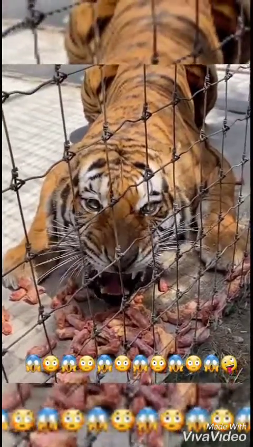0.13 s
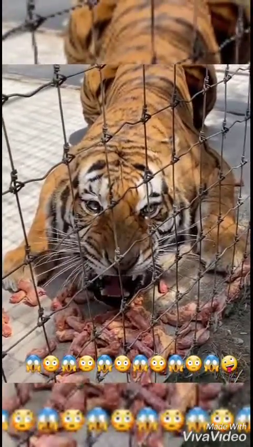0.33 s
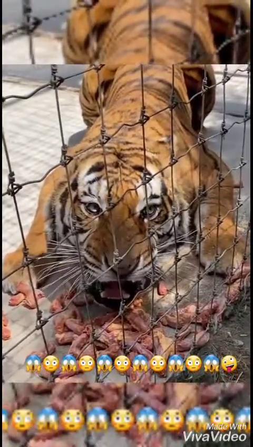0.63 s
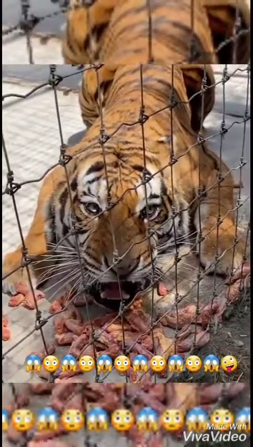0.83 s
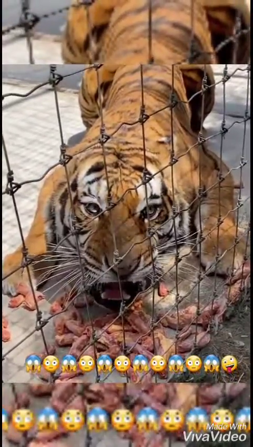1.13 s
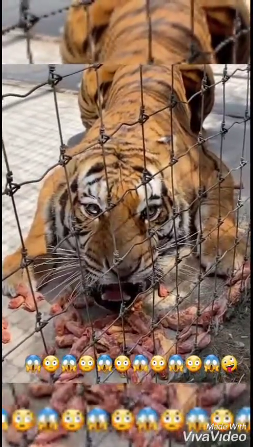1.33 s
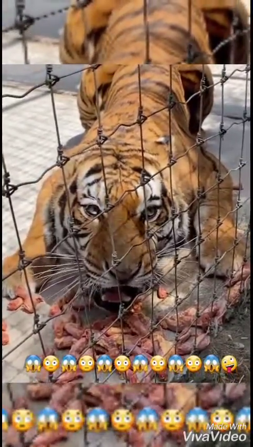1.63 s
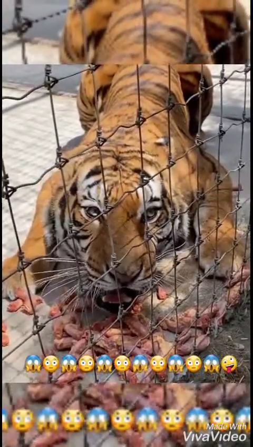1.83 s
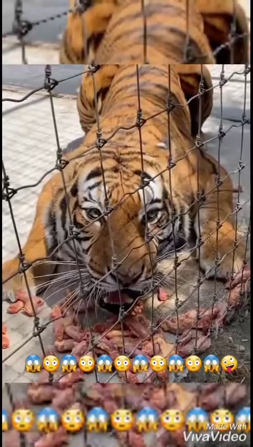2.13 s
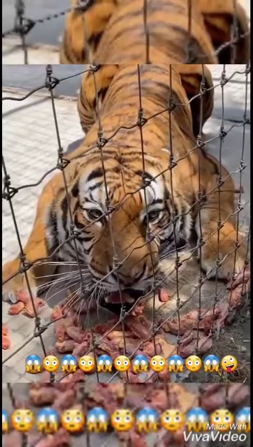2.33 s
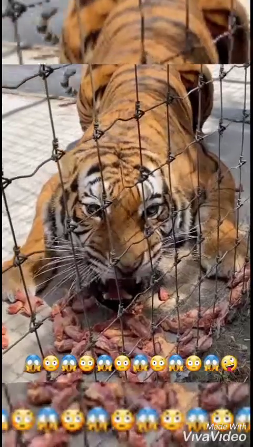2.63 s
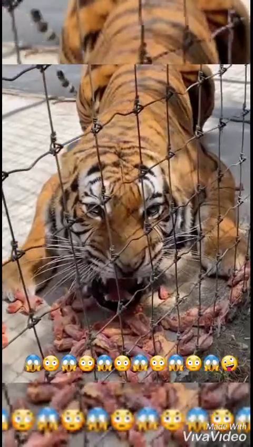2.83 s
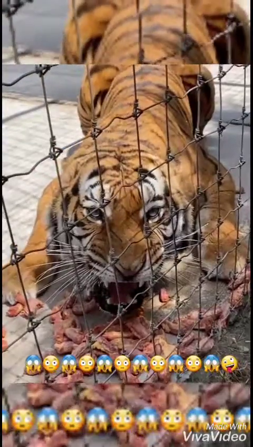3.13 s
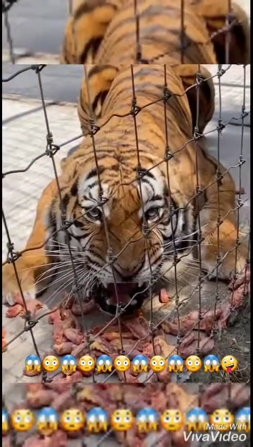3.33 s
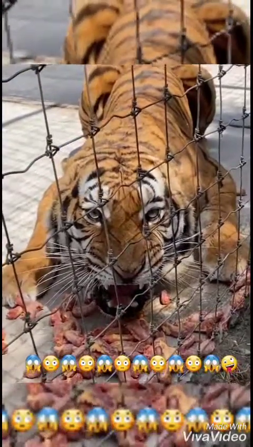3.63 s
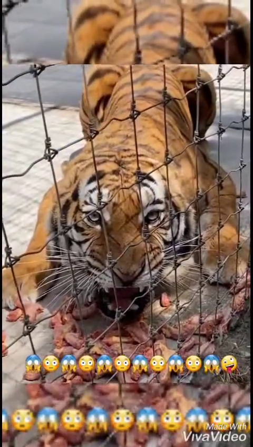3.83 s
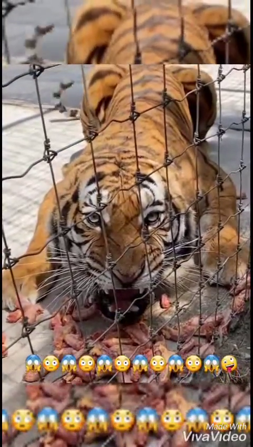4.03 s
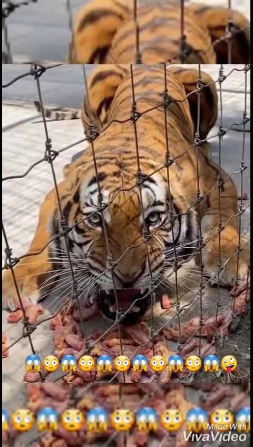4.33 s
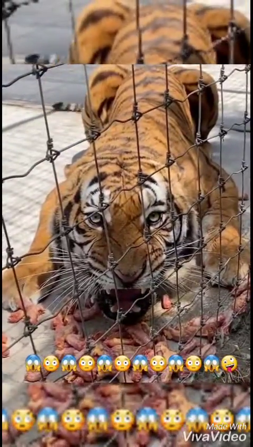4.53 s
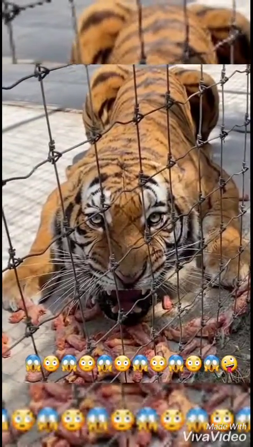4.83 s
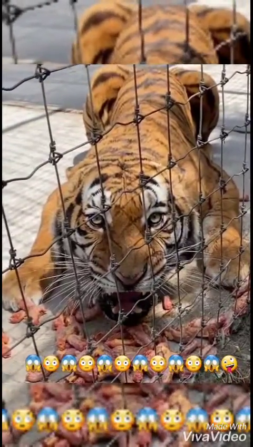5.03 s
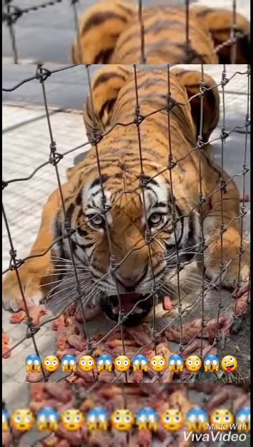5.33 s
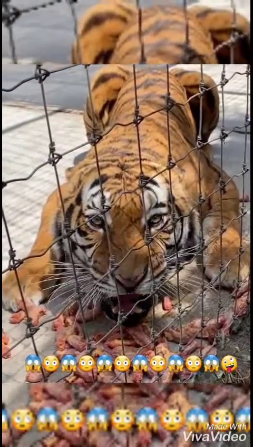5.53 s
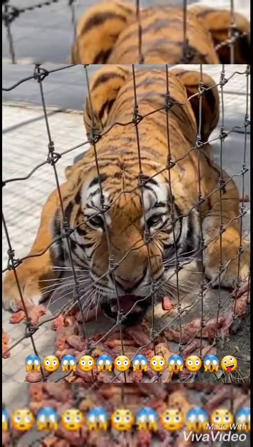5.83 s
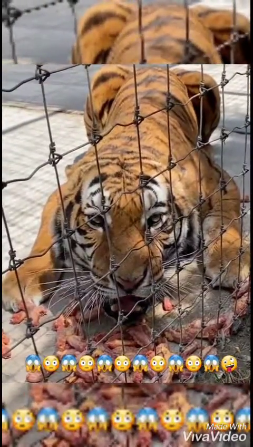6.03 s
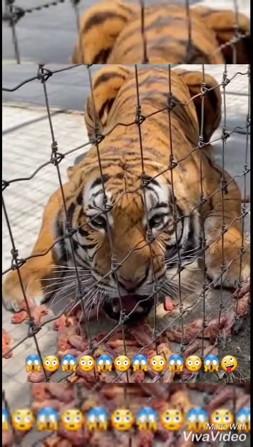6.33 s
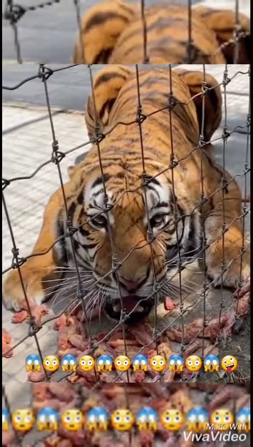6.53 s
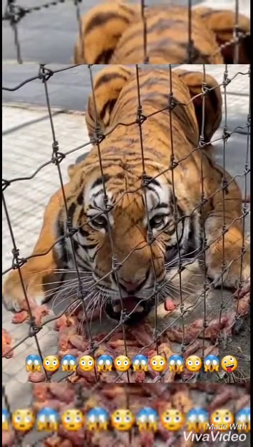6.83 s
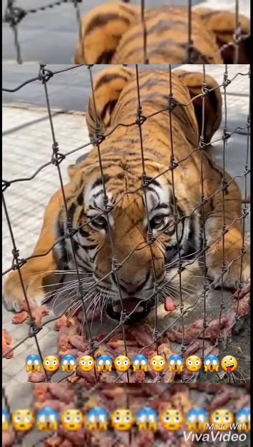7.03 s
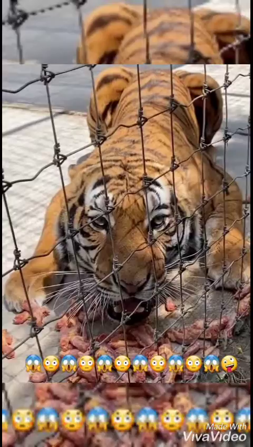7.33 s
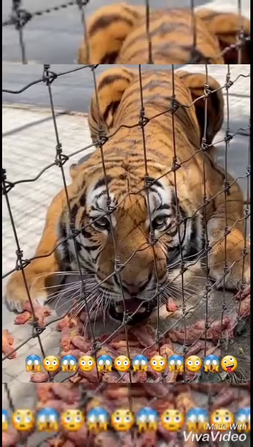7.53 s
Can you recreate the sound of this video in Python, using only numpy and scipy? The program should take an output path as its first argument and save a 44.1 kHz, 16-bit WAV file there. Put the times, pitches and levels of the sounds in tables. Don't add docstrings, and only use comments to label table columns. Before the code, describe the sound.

Outdoors in a paved yard, a tiger is very close to a phone microphone, with slight scatter from hard surfaces and faint distant rumble. From 0 to 1.7 s a pulsing growl, about 40 flaps a second, weakens and slows, with a brief rasp near 0.9. Tiny distant falling bird chirps come at 1.4, 1.6 and 2.1. At 1.8 a small hollow gasp starts an inward snore, quick then slow and popping, until 2.6. A long growl swells strongly around 2.8-3.1, then rattles lower, faintly raspy, thinning to isolated flaps by 5.3. A louder gasp at 5.4 leads a fast, ringing snore that slows into pops by 6.2. The last growl bursts into the loudest, hard raspy snarl at 6.4-6.8, then drops to a softer steady rattle until 7.7. Breath hisses through mouth and teeth; the treble is slightly patchy.

```python
import sys
import numpy as np
from scipy import signal
from scipy.fft import rfft, irfft, next_fast_len
from scipy.io import wavfile
from scipy.ndimage import uniform_filter1d, map_coordinates

SR = 44100
rng = np.random.default_rng(int(sys.argv[2]) if len(sys.argv) > 2 else 0)


def gain_from_decibels(decibels):
    exponent = np.asarray(decibels, float) / 20
    return 10 ** exponent


def pcm_store(signal):
    levels = np.round(np.clip(np.atleast_2d(signal), -1, 1) * 32767)
    wavfile.write(sys.argv[1], SR, levels.astype(np.int16).T)


N = 339112

# (start [s], end [s])
INWARD = [
    (1.8, 2.59),
    (5.41, 6.21),
]
MEAN_EFFORT_DB = -32
SLOW_HZ = 31


def unit(x):
    return x / np.sqrt(np.mean(x ** 2) + 1e-20)


def look_up(table, x):
    return np.interp(x, *np.transpose(table))


def curves(tables):
    s, *cols = np.transpose(np.concatenate(tables))
    return [np.interp(np.arange(N) / SR, s, c) for c in cols]


def wobble(rate):
    knots = rng.standard_normal(int(N * rate / SR) + 4)
    return map_coordinates(knots, [np.arange(N) * rate / SR])


def filtered(x, response):
    m = next_fast_len(N + SR // 2)
    return irfft(rfft(x, m) * response(np.fft.rfftfreq(m, 1 / SR)), m)[:N]


def tract(x, modes, low_hz):
    def response(f):
        ring = 0
        for k, (c, w, db) in enumerate(modes):
            ring = ring + (-1) ** k * gain_from_decibels(db) * 1j * f * w / (c * c - f * f + 1j * f * w)
        ring = ring * (1j * f / (low_hz + 1j * f)) ** 2
        return ring / np.sqrt(np.mean(np.abs(ring) ** 2))
    return filtered(x, response)


def cat():
    folds = fold_motion()
    kicks, gate = flutter_edges(fold_kicks(**folds), air_gate(**folds), folds["chaos"])
    lumps = gain_from_decibels(2.88 * wobble(170))

    def voiced(shapes, low_hz, kick, db, depth):
        air = unit(gate ** depth * lumps * rng.standard_normal(N))
        push = (air + kick * kicks) / np.sqrt(1 + kick ** 2) * gain_from_decibels(db)
        return sum(tract(push * when, modes, low_hz) for modes, when in shapes)

    parts = [part(voiced, **folds) for part in (chest, throat, mouth, teeth)]
    return chest_tone(**folds) + sum(parts)


def fold_motion():
    # (time [s], flap rate [Hz])
    fold_rates = [
        [(0.0, 40.55), (0.3, 37.05), (0.6, 36.1), (0.9, 33.34), (1.2, 32.0), (1.45, 24.65), (1.7, 14.86)],
        [(1.8, 45.05), (1.87, 58.55), (1.97, 52.95), (2.06, 27.37), (2.25, 24.9), (2.58, 25.37)],
        [(2.61, 40.12), (2.72, 48.3), (2.87, 58.42), (3.05, 53.15), (3.35, 44.75), (3.68, 37.62), (4.4, 33.57),
         (4.9, 25.73), (5.32, 13.61)],
        [(5.41, 64.44), (5.47, 79.56), (5.55, 58.42), (5.7, 50.8), (5.85, 37.68), (5.97, 25.27), (6.2, 19.94)],
        [(6.22, 40.18), (6.3, 41.98), (6.5, 40.19), (6.7, 38.59), (6.85, 39.14), (7.05, 33.97), (7.35, 33.3),
         (7.69, 30.41)],
    ]
    # (time [s], effort [dB], mouth opening [dB], chest ring [0-1])
    growls = [
        [(0.0, -30, -5, 0), (.03, -35, 3, 0.3), (.5, -39.5, 1.5, 0.35), (.84, -37.5, -1, 0.03),
         (.93, -38.5, -1.5, 0.92), (1.15, -45, 1, 0.35), (1.35, -49.5, -1, 0.63), (1.6, -50.5, -7.5, 0.21),
         (1.79, -54, -11, 0.9)],
        [(2.61, -43.5, 4.5, 0), (2.71, -27, 2, 0.03), (2.85, -23.5, 2.5, .03), (3.1, -25, 2, 0),
         (3.35, -32, 4, 0.3), (3.75, -32, 0.5, 0.4), (4.45, -38, 0, 0), (4.9, -50, -5, 0.52),
         (5.4, -57, -2, 0.2)],
        [(6.22, -30.5, -9, 0.45), (6.28, -33.5, 2, 0.76), (6.4, -22, -1, 0.64), (6.56, -19.5, -2, .7),
         (6.74, -24.5, -0.5, 0.72), (6.95, -35, -1, 0.78), (7.13, -40.5, 1, 0.7), (7.45, -40, -0.5, .3),
         (7.69, -43.5, -2, 0.3)],
    ]
    # (time [s], effort [dB], mouth opening [dB], chest ring [0-1])
    snores = [
        [(1.8, -46.5, 1.5, 0.07), (1.89, -37.5, 9.5, 0), (1.97, -39, 5.5, 0), (2.07, -46.5, 7.5, 0.37),
         (2.11, -34.5, -0.5, 0.85), (2.3, -33, 2, 0.4), (2.46, -34.5, 1.5, 0.7), (2.55, -29, -9, 0.2),
         (2.6, -39.5, -10, 0.8)],
        [(5.41, -38.5, -0.5, 0.02), (5.44, -40.5, 8.5, .1), (5.5, -28, 4.5, .6), (5.56, -28, 1, 0.94),
         (5.78, -30.5, 4.5, 0.95), (5.9, -36, 6.5, 0.8), (6.07, -39.5, 4.5, 0.1), (6.13, -32, -8.5, 0.1),
         (6.21, -69, 17, .4)],
    ]
    # (time [s], extra level [dB])
    pops = [(2.112, 8), (2.306, 4), (2.383, 2), (3.69, 4), (3.715, 4), (5.748, 3), (5.793, 4), (5.934, 5),
            (5.965, 3), (6.044, 8), (6.088, 7)]
    # (flap rate [Hz], scatter [dB])
    growl_scatter = [(22, 1.5), (35, .4)]
    snore_scatter = [(25, 1.5), (45, .8)]
    swell_s, alternate_db = .005, 1
    t = np.arange(N) / SR
    rate_hz, = curves(fold_rates)
    effort_db, opening_db, ring = curves([sorted(sum(growls + snores, []))])

    times = openings(rate_hz, jitter=.012)
    snore = sum((times >= start) & (times < end) for start, end in INWARD) > 0
    times = times - swell_s * snore
    pace_hz = np.interp(times, t, rate_hz)
    cycle = np.clip(np.searchsorted(times, t, "right") - 1, 0, None)

    luck = rng.standard_normal((len(times), 6))
    scatter_db = np.where(snore, look_up(snore_scatter, pace_hz), look_up(growl_scatter, pace_hz))
    own_db = (luck[:, 2:] * scatter_db[:, None])[cycle].T
    turns = (-1) ** np.arange(len(times)) * (snore & (pace_hz < SLOW_HZ))
    nearest = [np.abs(times - s).argmin() for s, db in pops]
    stuck_db = np.bincount(nearest, [db for s, db in pops], len(times))
    return dict(
        t=t, rate_hz=rate_hz, effort_db=effort_db, swing_db=effort_db - MEAN_EFFORT_DB,
        opening_db=opening_db, ring=np.clip(ring, 0, 1), chaos=strain(),
        times=times, snore=snore, pace_hz=pace_hz, period=np.diff(times, append=N), luck=luck,
        cycle=cycle, since=np.abs(t - times[cycle]), inward=snore[cycle],
        lowered=t > 6.215,
        own_db=own_db, turn_db=(alternate_db * turns)[cycle], stuck_db=stuck_db, pop_db=stuck_db[cycle])


def openings(rate_hz, jitter):
    # (start [s], last flap [s])
    breaths = [
        (0, 1.665),
        (1.798, 2.543),
        (2.59, 5.287),
        (5.409, 6.181),
        (6.216, 7.668),
    ]
    t = np.arange(N) / SR
    turns = np.cumsum(rate_hz) / SR
    times = []
    for start, last in breaths:
        counts = np.arange(*np.interp([last, start], t, turns), -1)
        times.append(np.interp(counts, turns, t))
    times = np.sort(np.concatenate(times))
    times = times + jitter * rng.standard_normal(len(times)) / np.interp(times, t, rate_hz)
    return np.append(np.abs(times), N / SR + .01)


def strain():
    # (start [s], end [s], share taken over [0-1])
    strains = [
        (.865, 1.015, .7),
        (3.61, 4.75, .3),
        (5.51, 5.59, .35),
        (6.35, 6.9, .7),
    ]
    rise_s, rest = .06, .08
    t = np.arange(N) / SR
    held = sum(share * ((t > start) & (t < end)) for start, end, share in strains)
    return np.maximum(uniform_filter1d(held, round(rise_s * SR)), rest)


def opening_shape(snore, pace_hz, period, luck, stuck_db, **rest):
    rise = np.where(snore, .0058, np.where(pace_hz > SLOW_HZ, .004, .003)) * gain_from_decibels(-.25 * stuck_db)
    open_s = np.where(snore, .36, .55) * period * gain_from_decibels(.6 * luck[:, 1])
    longest_s = np.where(snore, 0.011, .022)
    return rise, np.minimum(open_s, longest_s)


def fold_kicks(times, luck, rate_hz, **rest):
    rise, open_s = opening_shape(luck=luck, **rest)
    kicks = np.zeros(N)
    for delay, db in [(1.1 * rise, 0), (open_s, -6)]:
        at = np.round((times + delay) * SR).astype(int)
        kicks[at[at < N]] += gain_from_decibels(db + 1.5 * luck[at < N, 0])
    return kicks / np.sqrt(rate_hz / SR)


def air_gate(rate_hz, cycle, since, lowered, **rest):
    # (flap rate [Hz], level [dB])
    leak = [(27, -12.5), (40, -9.5), (60, -12.5)]
    lowered_leak_db = 6.5
    rise, open_s = opening_shape(**rest)
    shut = 1 / (1 + np.exp(np.clip((open_s[cycle] - since) / 0.0014, -30, 30)))
    gap = (1 - np.exp(-(since / rise[cycle]) ** 2.6)) * gain_from_decibels(-120 * since) * (1 - shut)
    return 1.3 * gap + gain_from_decibels(look_up(leak, rate_hz) + lowered_leak_db * lowered - 70 * since)


def flutter_edges(kicks, gate, chaos):
    edge_hz = 174
    edge = np.cumsum(edge_hz * (1 + .07 * wobble(70))) / SR
    ticks = np.diff(np.floor(edge), prepend=0) * gain_from_decibels(3.33 * wobble(110)) / np.sqrt(edge_hz / SR)
    kicks = np.sqrt(1 - chaos) * kicks + 0.96 * np.sqrt(chaos) * ticks
    puffs = 0.83 * (1 + .5 * np.cos(2 * np.pi * edge)) * gain_from_decibels(1.03 * wobble(45))
    return kicks, (1 - chaos) * gate + chaos * puffs


def chest_tone(t, times, period, cycle, rate_hz, swing_db, ring, chaos, inward, **rest):
    # (frequency [Hz], level [dB])
    radiated = [(18, -25), (28, -17.5), (40, 0), (55, 0.5), (110, 2.5), (170, -19)]
    overtones_db = (6, 0.3, -2)
    catch_s = 0.086
    third_rings_db = -0.5
    level_db = -27.5 + 0.81 * swing_db - 16.5 * chaos + (-5.3 + 4) * inward
    caught = sum((t > start) & (t < start + catch_s) for start, end in INWARD)
    flapping = np.abs(uniform_filter1d(1. * (period[cycle] < .07) - caught, size=900))
    phase = 2 * np.pi * np.interp(t, times, np.arange(len(times)))
    tone = np.zeros(N)
    for k, db, lag in zip((1, 2, 3), overtones_db, (1.9, 2.5, 3.4)):
        harmonic_db = db + look_up(radiated, k * rate_hz) + third_rings_db * ring * (k == 3)
        tone += gain_from_decibels(level_db + harmonic_db + 1.1 * wobble(12)) * np.cos(k * phase + lag)
    return flapping * tone


def chest(voiced, swing_db, ring, inward, own_db, **rest):
    # (resonance [Hz], width [Hz], level [dB])
    chest_modes = [(65, 30, -7), (125, 70, -5.5), (174, 20, 4.5), (212, 45, -4)]
    db = -33 + 0.87 * swing_db + 6 * ring + 0.2 * inward + own_db[0]
    db = db + 1.5 + 1.5 * inward
    shapes = [(chest_modes, np.sqrt(ring)), (chest_modes[:2], np.sqrt(1 - ring))]
    return voiced(shapes, 40, np.where(inward, 1.4, .75), db, depth=.6)


def throat(voiced, rate_hz, effort_db, pop_db, turn_db, own_db, inward, **rest):
    # (resonance [Hz], width [Hz], level [dB])
    growl_modes = [(282, 54, 1), (389, 55.8, 1), (509.5, 63, -2.5), (636, 41, -5.5)]
    snore_modes = [(248, 82, -5.5), (366.5, 77, -1), (491, 96, -4.5)]
    # (flap rate [Hz], ratio [1])
    pressed = [(35, 1.2), (55, 2.5)]
    db = effort_db + .5 * pop_db - turn_db + own_db[1]
    shapes = [(growl_modes, ~inward), (snore_modes, inward)]
    return voiced(shapes, 130, look_up(pressed, rate_hz), db, depth=1.1)


def mouth(voiced, effort_db, opening_db, pop_db, turn_db, own_db, inward, lowered, **rest):
    # (resonance [Hz], width [Hz], level [dB])
    growl_modes = [(734.6, 15.6, 7.5), (924, 32, -1.5), (1317, 61, -5), (1807, 150, -7), (2027, 68, -1.5),
                   (2330, 380, -14)]
    snore_modes = [(716, 43, 3), (926, 16, -9), (1247, 110, -10.5), (1713, 130, -6.5), (1930, 120, -5.5),
                   (2360, 150, -15.5)]
    low_modes = [(726, 17, 5), (931.4, 4.9, -1.5), (1292, 59, -12.5), (1637, 150, -13.5), (1965, 170, -7.5),
                 (2487, 120, -14)]
    db = effort_db + opening_db - 3.5 + 0.2 * inward + pop_db + turn_db + own_db[2]
    shapes = [(growl_modes, ~inward & ~lowered), (snore_modes, inward), (low_modes, lowered)]
    return voiced(shapes, 220, np.where(inward, .32, .13), db, depth=0.94)


def teeth(voiced, rate_hz, effort_db, opening_db, pop_db, own_db, inward, lowered, **rest):
    # (resonance [Hz], width [Hz], level [dB])
    growl_modes = [(2972, 106, 0.5), (3374, 85, 4), (3632, 96, 1.5), (4400, 240, -7.5), (5060, 444, -6.5),
                   (5510, 1080, -11), (7120, 1800, -16.5), (9550, 1300, -17), (12320, 2100, -19)]
    snore_modes = [(2740, 500, 9), (3470, 350, 5.5), (4300, 320, -29), (5500, 1900, -10.5),
                   (6820, 2400, -15.5), (10400, 5000, -20)]
    low_modes = [(3020, 330, -8), (3466, 78, 2.5), (3716, 100, 1.5), (4410, 68, -6.5), (5180, 200, -13.5),
                 (5730, 540, -15.5), (7020, 670, -17), (9460, 9500, -25), (12600, 750, -26.5)]
    # (flap rate [Hz], level [dB])
    snored_hiss = [(24, -5), (34, 3), (45, 7), (60, 3)]
    # (flap rate [Hz], level [dB])
    growled_hiss = [(18, -6), (30, 0)]
    db = effort_db + 1.8 * opening_db - 9 + 0.66 * pop_db + own_db[3]
    db = db + (-14 + look_up(snored_hiss, rate_hz)) * inward
    db = db + look_up(growled_hiss, rate_hz) * ~inward
    shapes = [(growl_modes, ~inward & ~lowered), (snore_modes, inward), (low_modes, lowered)]
    return voiced(shapes, 1500, .045, db, depth=1.05)


def gasps():
    # (time [s], level [dB], cavity [Hz])
    gasp_list = [
        (1.803, -33, 738),
        (1.845, -33.5, 730),
        (5.424, -21.5, 744),
    ]
    out, t = np.zeros(N), np.arange(round(0.074 * SR)) / SR
    for s, db, hz in gasp_list:
        swell = gain_from_decibels(db + 9 - 890 * t) * (1 - np.exp(-t / 0.0042))
        out[round(s * SR):][:len(t)] += swell * np.sin(2 * np.pi * hz * t)
    return out


def bird():
    # (time [s], level [dB])
    chirps = [
        (1.4, -64),
        (1.62, -61),
        (2.078, -52),
    ]
    out, t = np.zeros(N), np.arange(round(0.052 * SR)) / SR
    whistle = np.hanning(len(t)) * np.sin(2 * np.pi * (4900 * t - 11000 * t ** 2))
    for s, db in chirps:
        out[round(s * SR):][:len(t)] += gain_from_decibels(db) * whistle
    return out


def yard():
    # (frequency [Hz], density [dB per Hz])
    rumble = [(18, -49), (40, -5), (130, -10), (600, -36.5), (2900, -40), (6000, -44), (7500, -66),
              (22000, -120)]
    f, v = np.transpose(rumble)
    hum = filtered(rng.standard_normal(N), lambda hz: gain_from_decibels(np.interp(np.log(hz + 1), np.log(f + 1), v)))
    return gain_from_decibels(-49.5 + 0.4 * wobble(3.2)) * unit(hum)


def scene():
    voice, t = cat() + gasps(), np.arange(SR // 8) / SR
    tail = rng.standard_normal(len(t)) * gain_from_decibels(-60 * t / .11)
    wet = signal.fftconvolve(voice, tail / np.linalg.norm(tail))[:N]
    return (voice + gain_from_decibels(-17) * wet + bird() + yard())[None]


def starve(x, size=2048, count=16):
    # (frequency [Hz], share of moments dropped [0-1])
    starved = [(2500, 0.006), (4500, 0.1), (6500, 0.24), (7500, 0.57), (11500, 0.52), (12500, 0.44)]
    # (start [s], end [s])
    overload = [
        (.5, .58),
        (2.9, 2.97),
        (3.62, 3.67),
        (6.4, 6.76),
        (6.8, 6.87),
        (7.3, 7.4),
    ]
    top_hz = 13250
    hz, t, z = signal.stft(x, SR, nperseg=size)
    bands = z[:-1].reshape(size // 2 // count, count, -1)
    level = 10 * np.log10(np.mean(np.abs(bands) ** 2, 1) + 1e-14)
    whole = 10 * np.log10(np.sum(np.abs(z) ** 2, 0) + 1e-14)
    centre = hz[count // 2::count]
    wide = centre[:, None] > 7700
    chance = np.where(wide, 5.5 * rng.standard_normal(whole.shape), 0)
    chance = chance + np.where(wide, 2.2, 5.5) * rng.standard_normal(level.shape)
    worth = np.where(wide, uniform_filter1d(level, size=9, axis=0), level)
    worth = worth - np.where(wide, .45, .6) * whole + chance
    short = sum((t > start) & (t < end) for start, end in overload)
    worth -= short * np.where(wide, 30 * (centre[:, None] < 11800) + 6, 5)
    rank = worth.argsort(1).argsort(1) / len(whole)
    dropped = np.interp(centre, *np.transpose(starved), left=-1)
    keep = (rank > dropped[:, None]) & (centre[:, None] < top_hz)
    z[:-1] *= np.repeat(keep, count, 0)
    return signal.istft(z, SR, nperseg=size)[1][:N]


def band_limit(x):
    return signal.sosfilt(signal.butter(12, 14200, fs=SR, output="sos"), x)


def record(dry):
    cut = filtered(dry[0], lambda f: (1j * f / (32 + 1j * f)) ** 2)
    return band_limit(starve(cut)[None])


dry = scene()
out = record(dry)
pcm_store(out)
```